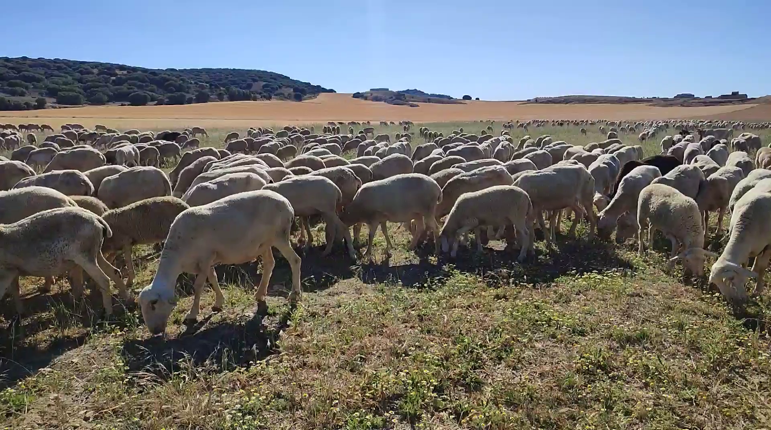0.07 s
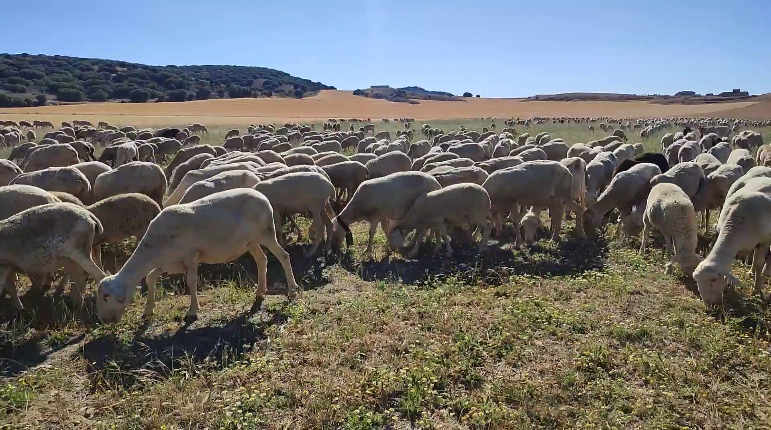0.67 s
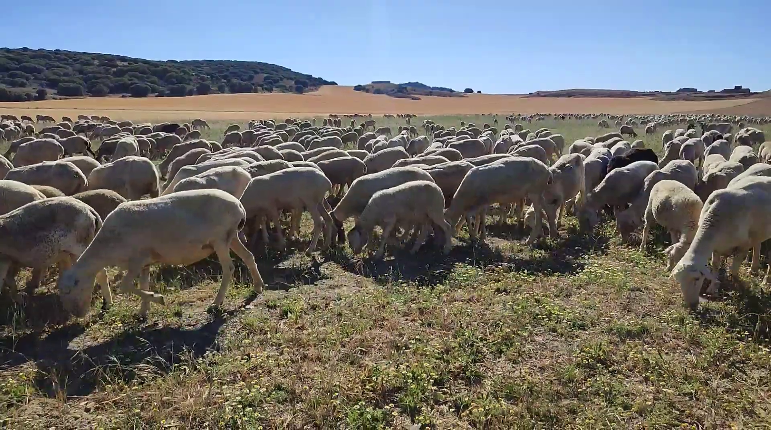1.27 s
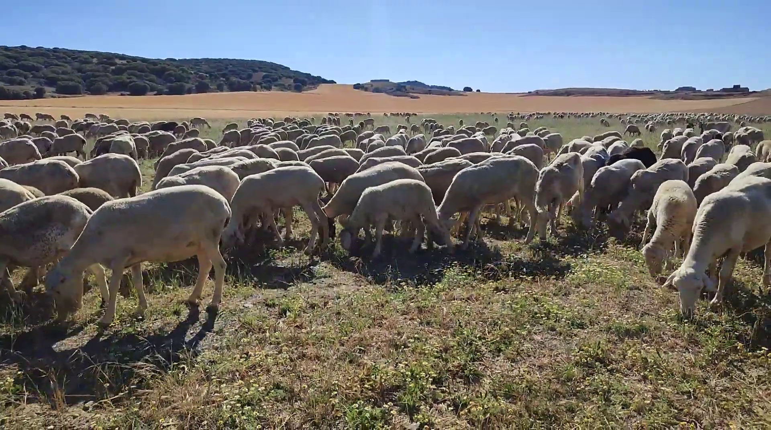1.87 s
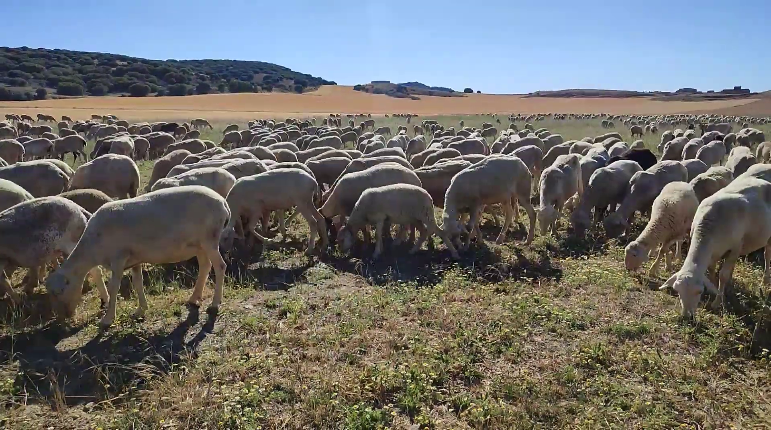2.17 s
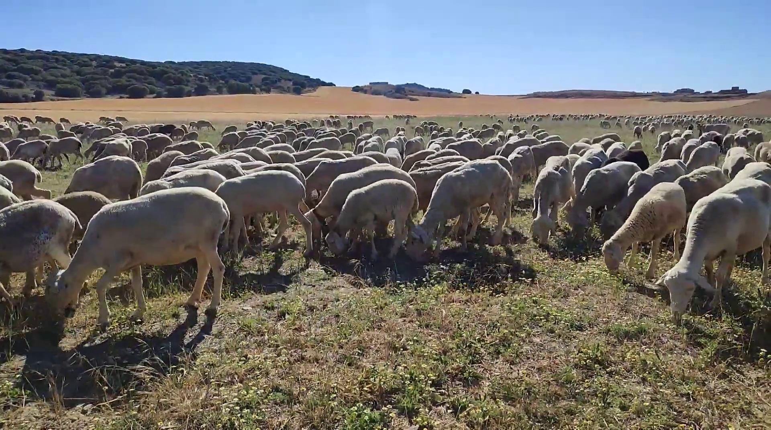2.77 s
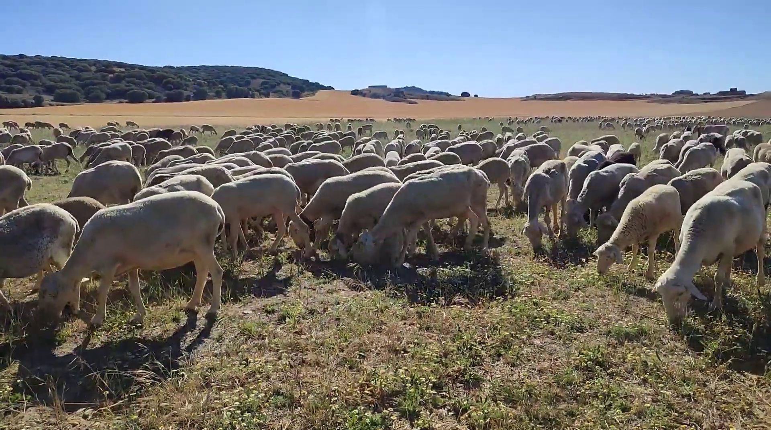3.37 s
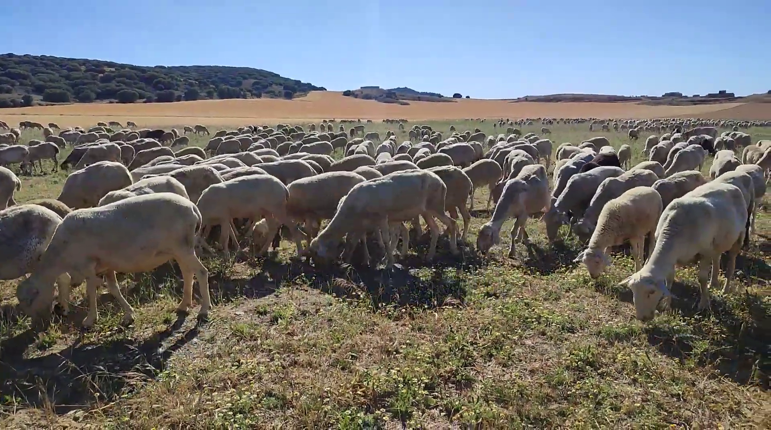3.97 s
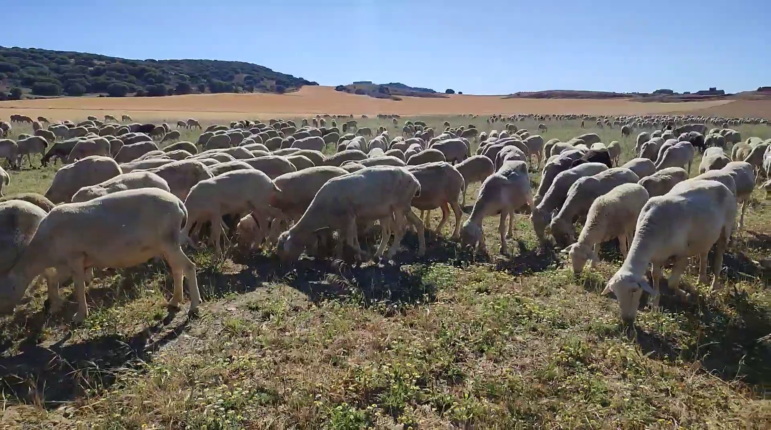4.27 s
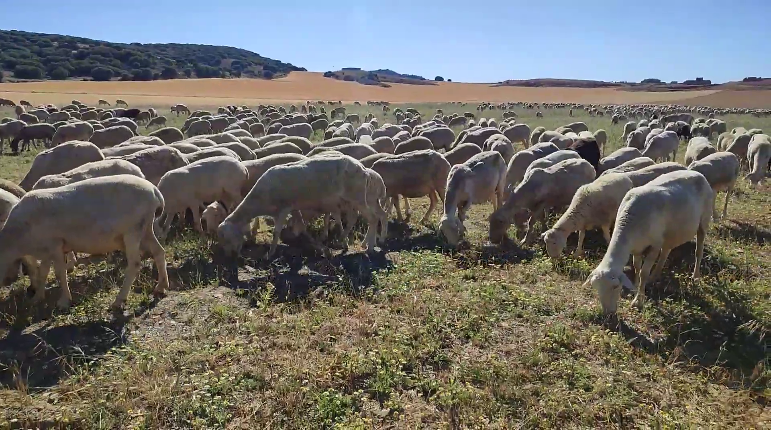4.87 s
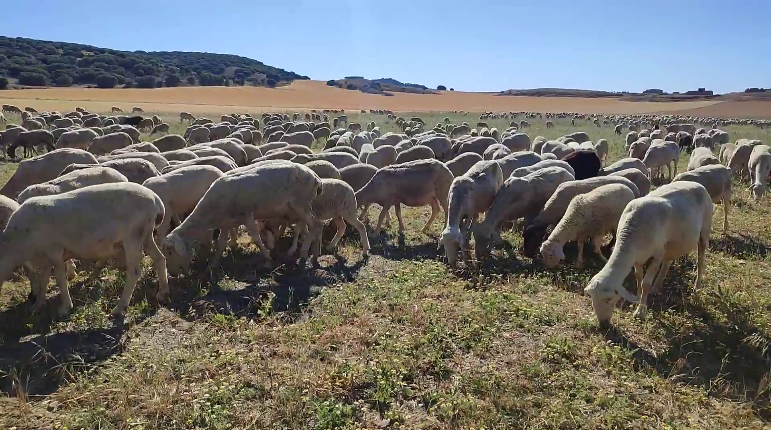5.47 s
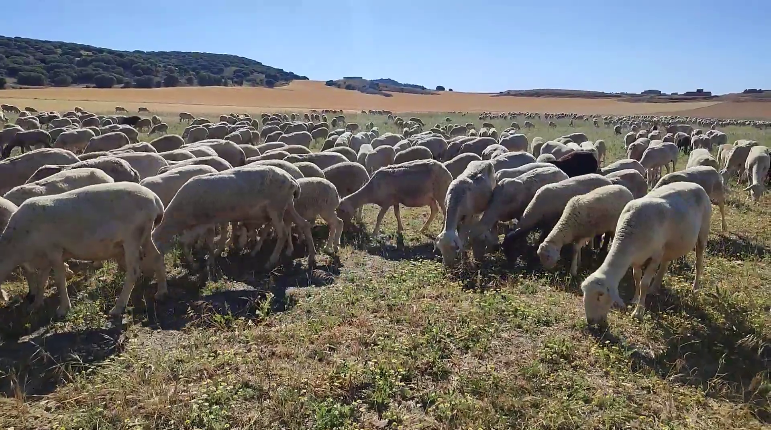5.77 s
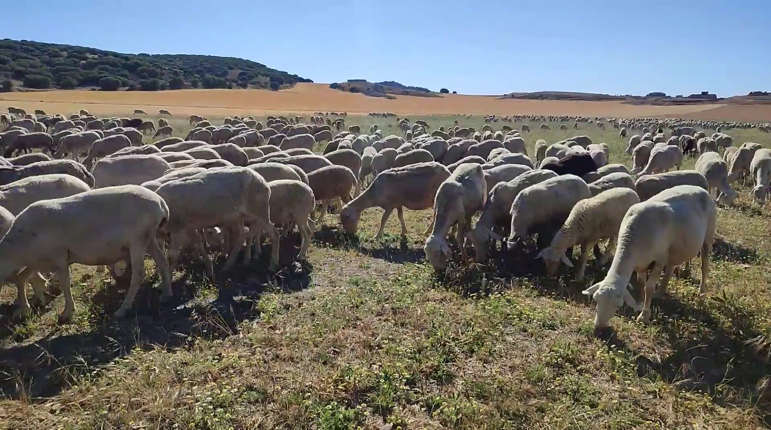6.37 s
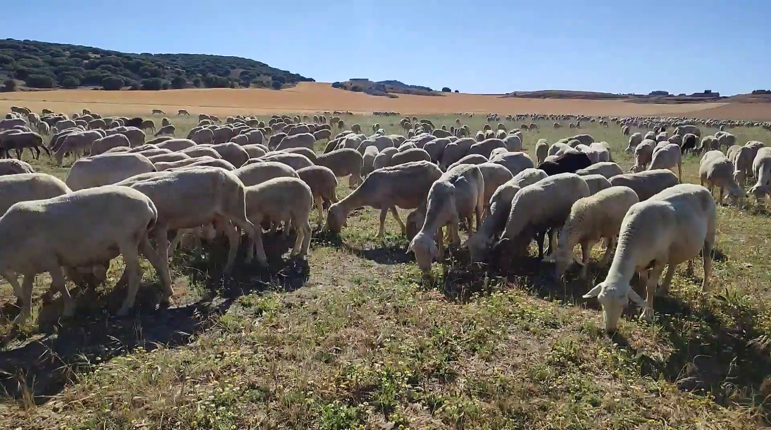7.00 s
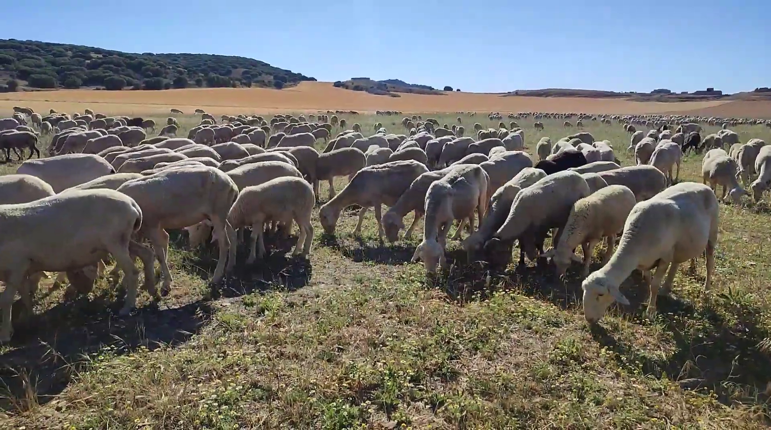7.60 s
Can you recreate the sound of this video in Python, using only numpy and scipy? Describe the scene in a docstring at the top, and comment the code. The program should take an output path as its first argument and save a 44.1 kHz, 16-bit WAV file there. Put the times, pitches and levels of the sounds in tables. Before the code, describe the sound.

In an open field, two metal neck bells on grazing sheep clank irregularly, close and slightly right, each hit leaving a hollow hum. Other bells tinkle faintly behind, and dry stalks crackle under mouths and hooves. One sheep gives a soft, buzzy bleat early on, and a very faint distant call comes around the middle. Wind rumbles on the microphone, growing gustier in the second half.

```python
"""An open field, where a flock of sheep grazes. Close by and a little to the right, clappers hit two
sheet-metal neck bells, and each hit makes a low hum and a bright clang. Dry stalks snap under mouths
and hooves, and other bells tinkle behind. One sheep bleats, pushing buzzy pulses through its throat.
Later comes a faint, far-off call, probably a distant sheep: a low fading tone with two thin overtones.
Gusts of wind shake the microphone more and more."""
import sys
import numpy as np
from scipy import signal
from scipy.fft import rfft, irfft
from scipy.io import wavfile
from scipy.ndimage import map_coordinates

SR = 44100
rng = np.random.default_rng(int(sys.argv[2]) if len(sys.argv) > 2 else 0)


def unload_wav(signal):
    """Save mono or channel-first audio to the path in sys.argv[1] as 16-bit WAV at rate SR, clipped to [-1, 1]."""
    wavfile.write(
        sys.argv[1],
        SR,
        np.round(np.clip(np.atleast_2d(signal).T, -1, 1) * 32767).astype(np.int16),
    )


N = 341334
TIME = np.arange(N) / SR

# The steady breeze, which picks up halfway: time_s, level_db
BREEZE = [(0, -42.5), (3.9, -44), (4.3, -35), (7.74, -35.5)]
# Gusts on top of the breeze: start_s, hold_s, level_db, left_minus_right_db
GUSTS = [(-.03, 0.01, -36, 11), (1.469, 0.25, -37, -5), (2.977, 0.008, -32.5, 6), (3.057, 0.32, -33, -4),
         (4.257, 0.53, -34, -9), (5.02, 0.68, -31.5, -5), (5.972, 0.012, -31.5, 17),
         (6.116, 0.67, -31, -2.5), (6.585, 0.034, -27, 21), (7.463, 0.28, -35, -25)]
# The tone of wind on the microphone, of open land and of a breaking stalk: frequency_hz, gain_db
WIND_TONE = [(12, -32), (20, 7), (43, 0), (124, -7.5), (201, -12), (307, -16.5), (600, -29.5), (780, -19.5),
             (1320, -120)]
FIELD_TONE = [(30, 10), (150, 0.5), (400, 6), (1200, -10), (3000, -7), (6000, -9), (9500, -16),
              (13000, -14)]
STALK_TONE = [(500, -2.5), (1500, -16), (3500, -4.5), (7000, -10), (9500, -21.5), (13000, -15.5)]
# How much louder a sound from the right is on the left side: frequency_hz, left_minus_right_db
SIDE_BALANCE = [(700, -1.7), (1900, 1), (3400, -31), (5200, -28.5), (7500, 9.5), (12000, -10.5)]
# Clapper hits on the lower and the higher near bell:
# start_s, hum_db, clang_db, rim_place_turns, hardness_db_per_octave
LOW_BELL_HITS = [(.0003,-41,-49,.57,4), (.9773,-42.5,-61.5,0.45,-5), (1.0809,-33.5,-44.5,.4,5),
                 (1.4735,-33,-44,0.38,1), (1.7213,-41.5,-54.5,0.24,1.6), (2.0461,-34.5,-39.5,0.17,1.5),
                 (2.1543,-37.5,-59,0.52,-4.5), (2.6993,-43.5,-55,0.25,0.5), (2.8959,-41,-56,0.16,-5.5),
                 (2.9469,-46,-52.5,0.49,7.5), (3.2545,-40.5,-52,0.47,9.5), (3.3503,-36,-40,0.37,5),
                 (3.9641,-34.5,-45.5,.68,6), (4.8495,-44,-52,0.11,-3), (5.0125,-33.5,-55,0.51,-1.7),
                 (5.1955,-35.5,-56.5,0.27,-8), (5.5923,-34,-41.5,0.89,1.5), (5.7667,-40,-55.5,0.4,2),
                 (5.8899,-41,-45.5,0.6,6)]
HIGH_BELL_HITS = [(.3145,-51.5,-54.5,0.43,2.5), (.4225,-50,-50.5,0.11,3), (.4475,-37,-47,0.21,-0.5),
                  (1.2535,-32,-42.5,0.67,10.5), (1.2835,-41.5,-47.5,0.072,-11), (1.4525,-37.5,-51.8,.24,3),
                  (2.2255,-40.5,-54.5,0.45,1), (2.3243,-38.5,-60,0.79,-3), (2.5963,-37,-58,0.61,1.5),
                  (3.3563,-33,-40,.02,-3), (4.2741,-41.5,-48,0.63,5.5), (4.4149,-41.5,-56.5,0.18,-2),
                  (4.5537,-39.5,-57,0.07,-7), (4.7201,-32,-44,0.31,6.5), (4.7683,-42,-54,0.69,-4),
                  (5.0497,-35.5,-59,.46,0), (5.6055,-41.5,-52.5,0.85,2), (6.0633,-39,-46.5,0.24,5),
                  (6.2803,-40,-51.5,0.73,6), (6.4113,-37.5,-53.5,.59,4.5), (6.9263,-39.5,-52.5,0.65,1.5),
                  (7.2581,-28.5,-36.5,0.85,0.5), (7.4413,-32,-53.5,.09,-6)]
HARD_HIT_DB = -28  # clang_db of a hit at full force
# Each oval bell's lowest note, split into two close pitches, and its hollow knock:
# pitch_hz, twin_hz, twin_gain_db, ring_s, knock_hz, knock_gain_db
HUM_NOTES = [(709.3, 702.5, -10, 1.6, 745, -3), (721.65, 719.6, -14, 1.9, 785, 1)]
# Notes of each near bell's metal wall, and where a hit wakes them best: pitch_hz, gain_db, place_turns
LOW_WALL_NOTES = [(1828.0, -11.3, 0.49), (1843.0, -9.7, 0.53), (1881.0, -18.5, 0.44), (3337.0, -17.4, 0.52),
                  (3415.0, -3.9, 0.85), (3746.0, -19.9, 0.32), (3878.0, -6.7, 0.56), (4650.0, -17.2, 0.04),
                  (4754.0, -19.3, 0.16), (5102.0, -5.5, 0.66), (5214.0, -6.8, 0.54), (5259.0, -7.7, 0.39),
                  (5465.0, -7.1, 0.02), (6716.0, -16.1, 0.01), (6766.0, -20.9, 0.34), (7031.0, -20.5, 0.95),
                  (7262.0, -21.8, 0.95), (7466.0, -18.9, 0.42), (7590.0, -15.0, 0.99)]
HIGH_WALL_NOTES = [(1913.0, -9.3, 0.48), (3419.0, -8.1, 0.9), (3488.0, -9.1, 0.35), (3772.0, -5.0, 0.73),
                   (3940.0, -16.6, 0.34), (4656.0, -13.0, 0.6), (4935.0, -13.0, 0.81),
                   (5126.0, -11.6, 0.22), (5250.0, -9.5, 0.9), (5385.0, -12.9, 0.97), (5438.0, -13.5, 0.35),
                   (7077.0, -16.8, 0.11), (7305.0, -26.5, 0.01), (7490.0, -17.8, 0.06),
                   (7598.0, -18.8, 0.03), (7725.0, -19.6, 0.35)]
# The highest wall notes, which need a strong hit to be heard: pitch_hz
LOW_SHIMMER = [8809, 9348, 9934, 10206, 11108, 11458, 12040, 12500, 12790, 13248]
HIGH_SHIMMER = [9200, 9821, 10112, 10352, 11307, 11740, 12497, 13057, 13463]
RING_CYCLES = 2700  # a wall note fades 60 dB in this many vibrations, so high notes die first
# Dry stalks snapping and tearing: start_s, level_db, length_s
STALK_SNAPS = [(0.12, -48, 0.049), (0.185, -49.5, 0.039), (0.791, -49, 0.02), (1.758, -33, 0.013),
               (3.785, -43, 0.011), (3.822, -40, 0.0041), (6.184, -44.5, 0.044), (6.647, -52.5, 0.032)]
# Hits on the small bell: start_s, level_db
SMALL_BELL_HITS = [(0.855, -52), (2.947, -50)]
# The small bell's notes: pitch_hz, gain_db
SMALL_BELL_NOTES = [(3702, 0), (3866, -4), (4578, -7)]
# The course of the bleat: time_s, pitch_hz, level_db, mouth_open_0_to_1, hoarseness_0_to_1
BLEAT_SHAPE = [(1.069, 157.3, -66, 0, 0.2), (1.136, 160.9, -51, 0, 0.4), (1.3, 170.1, -50.5, 0.6, 0.2),
               (1.43, 168.6, -45.5, 0.93, 0.24), (1.564, 163, -43.5, 1, 0.89),
               (1.62, 154.5, -53.5, 0.2, 0.4), (1.741, 151, -64, 0, 0.47)]
# The sheep's throat with the mouth nearly shut and wide open: frequency_hz, gain_db
THROAT_SHUT = [(300, -7), (900, -26), (1330, -6), (1600, -9), (2300, 10), (2750, -19), (3400, -18),
               (4500, -23), (7000, -30)]
THROAT_OPEN = [(300, -2.5), (900, -8), (1350, 2), (1600, -16), (2000, 4.5), (2400, 9.5), (2650, -4),
               (3000, 5), (4200, -2.5), (5500, -27), (9000, -19)]
# Faint, far-off calls: start_s, level_db
FAR_CALLS = [(4.098, -59.5), (4.361, -57), (5.009, -54.5)]
# The far call's low tone and its two thin overtones: pitch_hz, gain_db, fade_s
FAR_CALL_TONES = [(313, 10.5, 3.4), (1510, -12, 2), (2180, -2, 0.4)]


def amp(db):
    """Turns decibels into a number to multiply by."""
    return 10 ** (np.asarray(db) / 20)


def unit(x):
    """Scales a signal to an average strength (rms) of 1."""
    return x / np.sqrt(np.mean(x ** 2) + 1e-20)


def gain_at(table, hz):
    """Looks up the gain between the rows of a frequency_hz, gain_db table."""
    table_hz, db = np.transpose(table)
    return amp(np.interp(np.log(hz + 1), np.log(table_hz + 1), db))


def colour(x, table):
    """Gives a sound the tone in a table, at strength 1."""
    return unit(irfft(rfft(x) * gain_at(table, np.fft.rfftfreq(N, 1 / SR)), N))


def filtered(x, order, hz, kind):
    """Keeps the lows, the highs or a band; a higher order cuts more steeply."""
    return signal.sosfilt(signal.butter(order, hz, kind, fs=SR, output="sos"), x)


def drift(shape, hz):
    """A random wobble of strength 1, up to about hz wiggles a second."""
    keep_slow = np.exp(-(np.fft.rfftfreq(N, 1 / SR) / hz) ** 2)
    return unit(irfft(rfft(rng.standard_normal(shape)) * keep_slow, N))


def add(mix, start_s, sound):
    """Mixes a sound in at its start time."""
    part = mix[..., max(round(start_s * SR), 0):][..., :sound.shape[-1]]
    part += sound[..., :part.shape[-1]]


def ring(hz, db, ring_s, t):
    """One pure note that fades by 60 dB in ring_s."""
    return amp(db - 60 * t / ring_s) * np.sin(2 * np.pi * hz * t)


def from_right(x, delay_s=0.00014):
    """A sound from the right reaches the left side later, with much of its treble shaded."""
    hz = np.fft.rfftfreq(N, 1 / SR)
    shade = gain_at(SIDE_BALANCE, hz)
    sides = np.array([shade * np.exp(-2j * np.pi * hz * delay_s), np.ones(len(hz))])
    return irfft(rfft(x) * sides * np.sqrt(2 / (1 + shade ** 2)), N)


def wind_level_db(rise_s=0.023, fall_s=0.12):
    """The wind's level on each side: a gust rises fast, holds, then sinks back into the breeze."""
    power = amp(np.interp(TIME, *np.transpose(BREEZE))) ** 2
    for start_s, hold_s, db, side_db in GUSTS:
        rise = np.clip((TIME - start_s) / rise_s, 0, 1)
        fall = np.exp(-np.maximum(TIME - start_s - rise_s - hold_s, 0) / fall_s)
        sides = unit(amp([[side_db], [0]]))
        power = power + (amp(db) * sides * rise * fall) ** 2
    return 10 * np.log10(power)


def wind(gain_db=2.0, lump_db=3.5, deep_hz=70, body_growth=0.46, strong_db=-34,
         swirl_db=-18, swirl_growth=1.7, swirl_lump_db=8.5, swirl_hz=(110, 430)):
    """Air pushes unevenly on each side; strong gusts sound fuller and shed small, higher swirls."""
    level_db = wind_level_db()
    excess_db = level_db - strong_db
    lumps_db = lump_db * drift((2, N), 16)
    rumble = colour(rng.standard_normal((2, N)), WIND_TONE)
    rumble = unit(filtered(rumble, 1, 200, "low") * amp(lumps_db))
    deep = filtered(rumble, 1, deep_hz, "low")
    body = (rumble - deep) * amp(body_growth * excess_db)
    swirls = filtered(rng.standard_normal((2, N)), 3, swirl_hz, "band")
    swirls *= amp(lumps_db + swirl_lump_db * drift((2, N), 54))
    swirls = unit(swirls * amp([[0], [6]]))  # stronger on the right
    swirls *= amp(strong_db + swirl_db + swirl_growth * excess_db)
    return amp(gain_db + level_db) * (deep + body) + swirls


def wind_thumps(gain_db=-7, per_s=10, spread_db=6.0, width_s=0.00085):
    """Small swirls bump one side of the microphone or the other, as hard as the wind blows."""
    hits = (rng.random((2, N)) < per_s / SR) * amp(spread_db * rng.uniform(-0.99, 1, (2, N)))
    age = TIME[:SR // 20] / width_s
    bumps = signal.fftconvolve(hits, [age ** 3 * np.exp(-age)], axes=1)[:, :N]
    return amp(gain_db + wind_level_db()) * unit(bumps)


def field(hush_db=-57, crackle_db=-65, crackles_per_s=70, spread_db=4.0):
    """The hush of open land, and the fine crackle of many mouths and hooves in dry grass."""
    hush = colour(rng.standard_normal((2, N)) + 0.26 * rng.standard_normal(N), FIELD_TONE)
    moments = rng.random(N) < crackles_per_s / SR
    clicks = moments * amp(spread_db * np.minimum(rng.exponential(1, (2, N)), 4))
    one_crack = rng.standard_normal((2, 400)) * np.exp(-TIME[:400] / 0.0024)
    crackle = colour(signal.fftconvolve(clicks, one_crack, axes=1)[:, :N], STALK_TONE)
    return amp(hush_db) * hush + amp(crackle_db) * crackle


def bell_mouth(x, band_hz=(673, 836)):
    """The bell's opening lets out only the pitches near its lowest note."""
    return filtered(x, 2, band_hz, "band")


def hum(hits, notes, contact_s=0.00047, softening=0.49, stop_s=0.014,
        knock_s=0.12, knock_share=0.78, peak_db=2.5, peak_s=0.0047):
    """Each hit restarts two close notes that throb together; hard hits start faster and knock more."""
    hz, twin_hz, twin_db, ring_s, knock_hz, knock_db = notes
    out = np.zeros(N)
    ends_s = [hit[0] for hit in hits[1:]] + [N / SR]
    for (start_s, db, clang_db, *_), end_s in zip(hits, ends_s):
        t = np.arange(0, end_s - start_s + stop_s, 1 / SR)
        rise_s = contact_s * amp(softening * (HARD_HIT_DB - clang_db))
        fades = np.clip(np.minimum(t / rise_s, (t[-1] - t) / stop_s), 0, 1)
        first_peak = amp(peak_db * np.exp(-t / peak_s))
        pair = ring(hz, db, ring_s, t) + ring(twin_hz, db + twin_db, ring_s, t)
        knock = ring(knock_hz, knock_db + db + knock_share * (clang_db - db), knock_s, t)
        add(out, start_s, fades * first_peak * (pair + knock))
    return bell_mouth(out)


def rattle(sound, gap_s=0.006, bounce=0.34, count=4):
    """The clapper skids and bounces, so one hit is a few touches, each weaker than the last."""
    out, sizes = np.zeros(len(sound)), bounce ** np.arange(count)
    gaps = gap_s * rng.uniform(0.3, 1.6, count)
    for start_s, size in zip(np.cumsum(gaps) - gaps[0], sizes):
        add(out, start_s, size * sound)
    return out / np.linalg.norm(sizes)


def clang(hits, notes, shimmer_hz, place_db=7, pivot_hz=4500, tick_db=-7, tick_s=0.013, rise_s=0.001,
          peak_db=7.5, peak_s=0.064, shimmer_db=-7, shimmer_growth=0.96, spread_db=5.0):
    """Where and how hard the clapper lands picks the wall notes that ring; strong hits add shimmer."""
    out, t = np.zeros(N), TIME[:SR]
    hz, note_db, best_place = np.transpose(notes)
    walls = np.array([ring(f, db, RING_CYCLES / f, t) for f, db in zip(hz, note_db)])
    shimmers = np.array([ring(f, shimmer_db, RING_CYCLES / f, t) for f in shimmer_hz])
    fades = np.minimum(1, t / rise_s) * np.minimum(1, 10 * (t[-1] - t))
    first_peak = amp(peak_db * np.exp(-t / peak_s))
    for start_s, _, db, place, hardness in hits:
        wall_db = hardness * np.log2(hz / pivot_hz) + place_db * np.cos(2 * np.pi * (place - best_place))
        bright_db = shimmer_growth * (db - HARD_HIT_DB) + spread_db * rng.standard_normal(len(shimmers))
        tick = amp(tick_db) * np.exp(-t / tick_s) * rng.standard_normal(SR)
        touch = amp(wall_db) @ walls + amp(bright_db) @ shimmers + tick
        add(out, start_s, amp(db) * fades * first_peak * rattle(touch))
    return out


def swing(x, travel_s=0.00004):
    """A bell moving to and fro bends its pitch very slightly."""
    return map_coordinates(x, [(TIME + travel_s * drift(N, 6)) * SR])


def echo(x, gain_db=-10, fade_s=0.087):
    """The ground and the sheep's bodies throw back a short, blurred echo, different on each side."""
    t = TIME[:SR // 4]
    bounces = rng.standard_normal((2, len(t))) * amp(-60 * t / fade_s) * (t > 0.002)
    bounces /= np.linalg.norm(bounces[0])
    return amp(gain_db) * signal.fftconvolve(x[None], bounces, axes=1)[:, :N]


def near_bells(hum_db=2.5, hum_sway_db=2.5, wall_sway_db=3.7, sway_hz=20):
    """Two swinging bells sweep their beams of sound past the microphone, so their loudness wavers."""
    hums, walls = np.zeros(N), np.zeros(N)
    for hits, hum_notes, wall_notes, shimmer_hz in (
            (LOW_BELL_HITS, HUM_NOTES[0], LOW_WALL_NOTES, LOW_SHIMMER),
            (HIGH_BELL_HITS, HUM_NOTES[1], HIGH_WALL_NOTES, HIGH_SHIMMER)):
        hums += amp(hum_db + hum_sway_db * drift(N, sway_hz)) * swing(hum(hits, hum_notes))
        walls += amp(wall_sway_db * drift(N, sway_hz)) * swing(clang(hits, wall_notes, shimmer_hz))
    return from_right(hums + walls) + echo(walls)


def chewing_nudges(level_db=-60, per_s=7, spread_db=9, ring_s=1.65, detune_hz=2, count=60):
    """Chewing keeps nudging both near bells: too softly to clang, but enough to keep them humming."""
    out = np.zeros(N)
    for hz, *_ in HUM_NOTES:
        for k, (shift, force, detune) in enumerate(rng.uniform(-1.1, 1, (count, 3))):
            note = ring(hz + detune_hz * detune, level_db + spread_db * force, ring_s, TIME[:SR])
            add(out, (k + shift / 2) / per_s, note)
    return from_right(bell_mouth(out))


def flock_jingle(level_db=-69, hardness=-5, size_ratio=1.016, count=26):
    """Deeper in the flock, slightly bigger bells of the same kind tinkle at random."""
    out = np.zeros(N)
    for notes, shimmer_hz in ((LOW_WALL_NOTES, LOW_SHIMMER), (HIGH_WALL_NOTES, HIGH_SHIMMER)):
        hits = [(when * N / SR, 0, level_db, place, hardness) for when, place in rng.random((count, 2))]
        lower_notes = [(hz / size_ratio, *rest) for hz, *rest in notes]
        out += clang(hits, lower_notes, shimmer_hz)
    return out + echo(out, gain_db=3.0)


def stalk_snaps(grain_db=2.0, grain_hz=320):
    """Nearby stalks break in short, grainy bursts of noise."""
    loudness = np.zeros(N)
    for start_s, db, length_s in STALK_SNAPS:
        add(loudness, start_s, amp(db) * np.exp(-2 * TIME[:SR] / length_s))
    grains = rng.standard_normal((2, N)) * amp(grain_db * drift(N, grain_hz))
    return loudness * colour(grains, STALK_TONE)


def small_bell():
    """A small bell behind the two near ones pings with three thin, high notes."""
    out = np.zeros(N)
    ping = sum(ring(hz, db, RING_CYCLES / hz, TIME[:SR]) for hz, db in SMALL_BELL_NOTES)
    for start_s, db in SMALL_BELL_HITS:
        add(out, start_s, amp(db) * ping)
    return from_right(out) + echo(out)


def bleat(pitch_wobble=0.00837, quaver_db=3.0, rasp_db=-3, rasp_hz=(3500, 7000)):
    """Uneven pulses and hoarse breath pass the sheep's nasal throat, brighter as the mouth opens."""
    time_s, pitch_hz, db, opening, hoarse = np.transpose(BLEAT_SHAPE)
    opening, hoarse = np.interp(TIME, time_s, opening), np.interp(TIME, time_s, hoarse)
    pitch_hz = np.interp(TIME, time_s, pitch_hz) * (1 + pitch_wobble * drift(N, 41.5))
    cycle = (np.cumsum(pitch_hz) / SR) % 1  # runs from 0 to 1 in each pulse
    buzz = unit(sum(np.cos(2 * np.pi * k * cycle) for k in range(1, 40)))
    breath = unit((1 - cycle) * rng.standard_normal(N))
    voice = ((1 - hoarse) * buzz + hoarse * breath) / np.hypot(1 - hoarse, hoarse)
    voice = (1 - opening) * colour(voice, THROAT_SHUT) + opening * colour(voice, THROAT_OPEN)
    rasp = amp(rasp_db) * opening * hoarse ** 2 * unit(filtered(breath, 1, rasp_hz, "band"))
    loudness = amp(np.interp(TIME, time_s, db, left=-200, right=-200) + quaver_db * drift(N, 22))
    return from_right(loudness * (voice + rasp))


def far_call():
    """A faint, far-off call, probably a distant sheep: a low fading tone with two thin overtones."""
    out = np.zeros(N)
    call = sum(ring(hz, db, fade_s, TIME[:2 * SR]) for hz, db, fade_s in FAR_CALL_TONES)
    for start_s, db in FAR_CALLS:
        add(out, start_s, amp(db) * call)
    return from_right(out)


def wind_pop(time_s=6.144, gain_db=-3.5, push_s=0.00039, pull_s=0.0038, pull_share=0.48):
    """A swirl of air bursts on the left side: a sharp push inside a longer, weaker pull."""
    push = np.exp(-((TIME - time_s) / push_s) ** 2 / 2)
    pull = np.exp(-((TIME - time_s) / pull_s) ** 2 / 2)
    return np.outer([1, 0], amp(gain_db) * (push - pull_share * pull))


def scene():
    """Adds up the flock, the wind and the grass, as a left and a right channel."""
    flock = near_bells() + chewing_nudges() + flock_jingle() + small_bell() + far_call() + bleat()
    air = wind() + wind_thumps() + wind_pop()
    return flock + air + field() + stalk_snaps()


def record(dry, lowest_hz=18, highest_hz=14500):
    """The microphone drops the deepest rumble and the highest treble."""
    thinned = filtered(dry, 2, lowest_hz, "high")
    treble_cut = signal.firwin(401, highest_hz, window=("kaiser", 9), fs=SR)
    return signal.oaconvolve(thinned, treble_cut[None], "same")


dry = scene()
out = record(dry)
unload_wav(out)
```